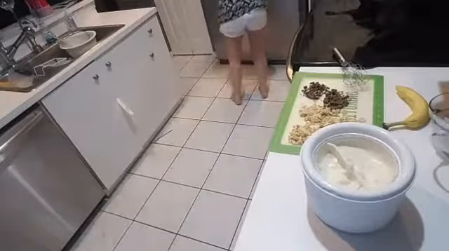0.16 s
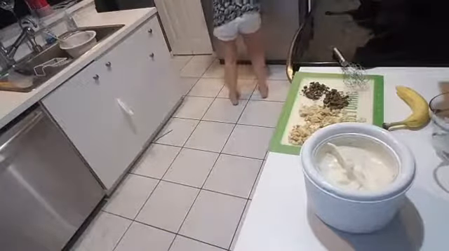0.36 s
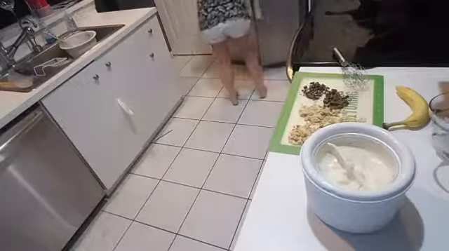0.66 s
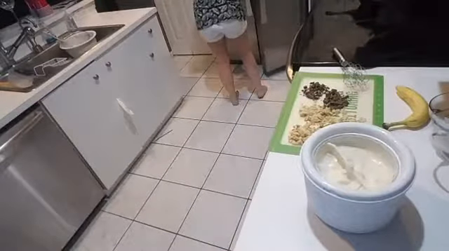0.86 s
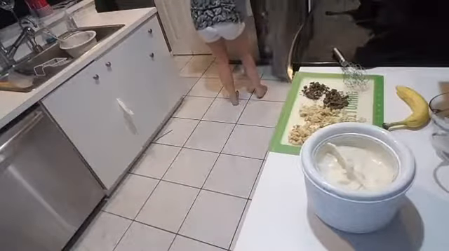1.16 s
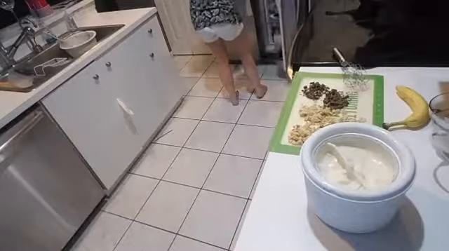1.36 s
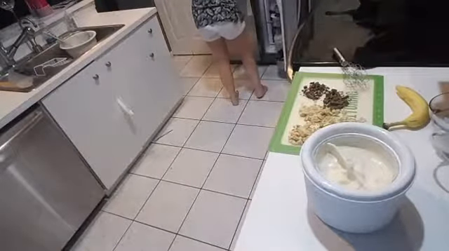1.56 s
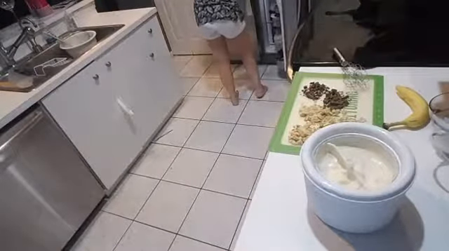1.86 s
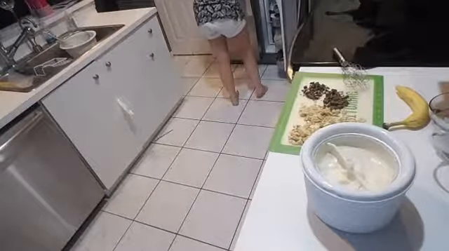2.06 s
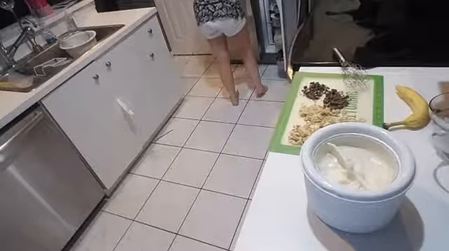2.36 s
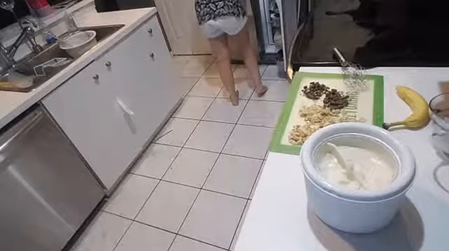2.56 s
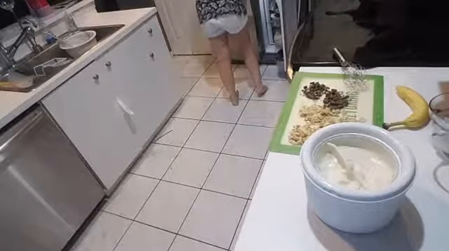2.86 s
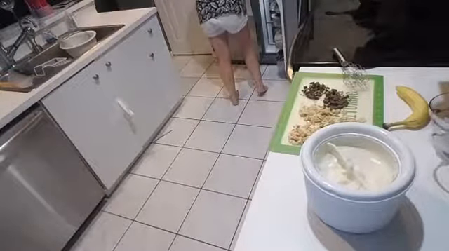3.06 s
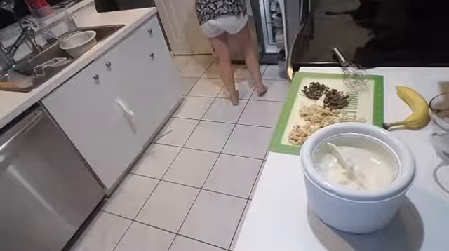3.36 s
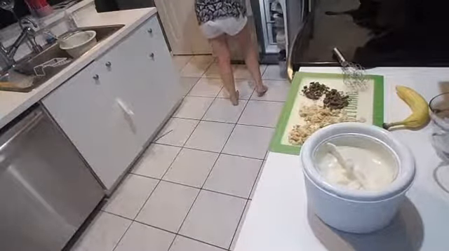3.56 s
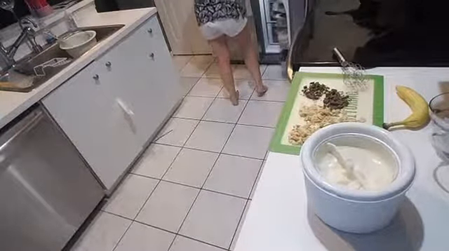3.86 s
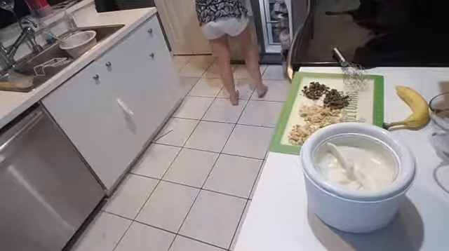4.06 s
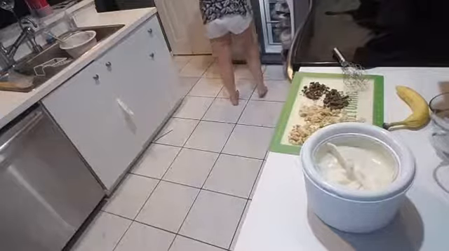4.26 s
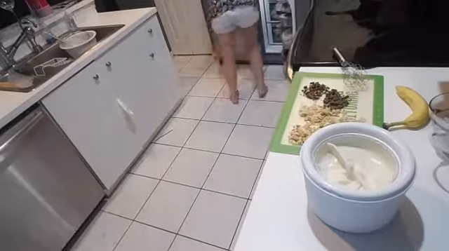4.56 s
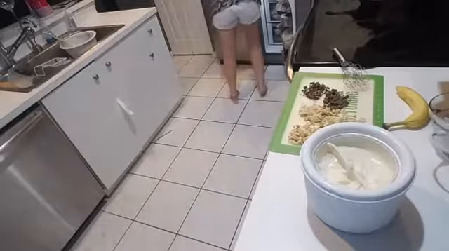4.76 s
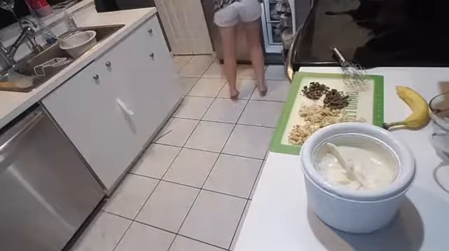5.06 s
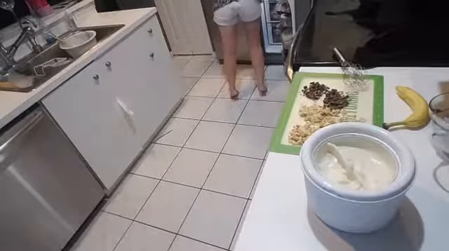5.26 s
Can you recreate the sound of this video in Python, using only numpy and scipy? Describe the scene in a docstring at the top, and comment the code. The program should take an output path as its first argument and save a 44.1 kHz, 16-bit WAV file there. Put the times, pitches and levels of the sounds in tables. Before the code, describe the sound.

A freezer door clunks open with a clink and jar rattle, then a bowl bangs onto a wire shelf over a low fan hum.

```python
"""A freezer door is pulled open across a tiled kitchen: a fan hums throughout, as noise rumble and air.
First come knocks (noise rattles and swinging panels), a clink of the handle and jars chattering in the
door bins (noise through resonances), amid rubbing (grainy noise). Then a bowl is set and slid on a wire
shelf (resonances struck and driven by noise), and knocks and rubbing end the scene. The microphone hears
direct sound and kitchen reverberation about equally, the booms nearly dry, with some recorder hiss."""
import sys
import numpy as np
from scipy import signal
from scipy.fft import rfft, irfft, next_fast_len
from scipy.io import wavfile
from scipy.ndimage import uniform_filter1d, map_coordinates

SR = 44100
rng = np.random.default_rng(int(sys.argv[2]) if len(sys.argv) > 2 else 0)


def log_audio(samples):
    """Write samples as a 16-bit WAV file to the path given in sys.argv[1]."""
    # one column per channel
    frames = np.atleast_2d(samples).T
    # limit to full scale, then quantise
    limited = np.clip(frames, -1, 1)
    pcm = np.round(limited * 32767).astype(np.int16)
    wavfile.write(sys.argv[1], SR, pcm)


N = 238140


def knocks():
    """Each knock is a short rattle of contacts that rings the liner; its slow push booms in the cabinet."""
    # things knocking inside: t/s, clack level/dB, boom level/dB, boom f/Hz,
    # body and treble level/dB (tilts of the clack's colour), contact fade/ms (held to 2-60)
    knock_rows = [(0.1286, -53, -51, 221, 15, -17, 18), (0.16, -50, -55, 101, 12.5, -5.5, 26),
                  (0.401, -14, -47, 62, -13.5, -12, 14), (0.4072, -9, -40, 104, -13.5, -33, 5.1),
                  (0.4357, -28, -48, 216, -28, -11, 16), (0.539, -25, -41, 240, -8, -15, 7.6),
                  (0.579, -20, -30, 151.7, 1, -15, 5), (0.5942, -47, -37, 142, -5, -27, 10),
                  (0.7492, -61, -50, 90, 2, -34, 7.2), (0.9539, -44.5, -49, 182, -19, -18, 24),
                  (1.561, -27.5, -58, 62, -13.5, 2.5, 8.2), (1.567, -13.5, -47, 153, -19.5, -35, 14.5),
                  (1.6113, -40, -49, 180, -1, -36, 18), (1.6344, -44, -52, 150, 6, 0, 7.6),
                  (2.0285, -72, -43, 96, -14, -19, 15), (2.6444, -25, -40.5, 203, -4.5, -16, 18),
                  (2.678, -31.5, -36, 223, -2.5, -15.5, 23.5), (2.815, -17.5, -31, 356, -2.5, -22, 17),
                  (2.827, -22.5, -22.5, 198, -2.5, -14, 23.4), (2.8491, -21, -30.5, 283, -4, -23.5, 10),
                  (3.027, -20.5, -42.5, 338, -7.5, -17, 14.7), (3.0362, -22, -31, 107, -4, -12.5, 19.4),
                  (3.0906, -29, -38.5, 237, -8, -13, 8), (3.6042, -38.5, -34, 218, 2.5, -22.5, 31.6),
                  (3.6246, -44, -32, 159.4, 8, -17, 14), (3.7598, -44.5, -52, 214, -1, -17, 9.6),
                  (4.3993, -32, -44, 152, -14, -23, 8), (4.4103, -23.5, -31.5, 230, -1.5, -26, 6.8),
                  (4.4218, -25.5, -18, 219, 8, -17, 3.1), (4.4496, -40, -23.5, 216.4, -12, -15, 10.5),
                  (4.535, -52, -47.5, 217, -22, -12, 29), (4.785, -38.5, -50, 192, 3.5, 2.5, 5.2),
                  (4.792, -36.5, -39, 235, -40, -11, 20.5), (4.9006, -45.5, -38.5, 194, 2.5, -10, 71),
                  (4.9376, -27, -44.5, 149, -14, -8, 7.4), (4.984, -35.5, -44, 228, -30, -10.5, 37),
                  (5.032, -29.5, -44, 99, -14.5, -4, 10.6), (5.0843, -45, -46, 205, -26, -9, 77),
                  (5.1774, -37, -52, 98, -14, -13, 10), (5.2299, -47, -39, 235, 9.5, -15, 6),
                  (5.2437, -45.5, -40, 223, -8, -14, 21), (5.2707, -40, -44.5, 255, 12, -8, 6.2),
                  (5.2845, -36, -35.5, 165, -5, -19, 12.6), (5.3098, -40, -41, 171, -19, -8, 18)]
    # plastic liner that every knock rings: f/Hz, width/Hz, level/dB (before scatter)
    liner_modes = [(612, 75, -5), (696, 125, -6), (1190, 124, -2), (1470, 130, -1.5), (2044, 70, -4),
                   (2368, 90, -4.5)]
    # cabinet panels: f/Hz, width/Hz, level/dB
    cabinet_modes = [(68.3, 19, -16.5), (101.4, 17, 0.5), (138, 21, -2), (221.8, 45, -1.5), (307, 26, 13),
                     (420, 31, -10)]
    liner_scatter_db = 2.5  # each knock wakes the modes differently
    boom_fade_s = 0.016
    clack_delay_s = 0.000934  # direct clack behind the start of the liner's ring
    length = SR // 2
    t = np.arange(length) / SR
    out = np.zeros(N + length)
    for s, db, boom_db, boom_hz, body_db, treble_db, contact_ms in knock_rows:
        contact_s = np.clip(contact_ms, 2, 60) / 1000
        fade = (1 - np.exp(-t / 0.0016)) * np.exp(-t / contact_s)
        # the roughness takes a new level every 64 samples
        roughness = amp(3.0 * rng.standard_normal(length // 64 + 1)).repeat(64)[:length]
        rattle = rng.standard_normal(length) * roughness * fade
        rattle = amp(db) * rattle * np.linalg.norm(fade) / np.linalg.norm(rattle)

        # clack colour: f/Hz, level/dB
        colour = [(120, body_db - 5), (300, body_db + 5), (600, body_db + 10.5), (1100, body_db + 1),
                  (2500, -2.5), (4500, -9.0), (7000, treble_db / 2 - 3), (10000, treble_db),
                  (13000, treble_db + 4.0)]
        ring = modes([(hz, width, level + liner_scatter_db * rng.standard_normal())
                      for hz, width, level in liner_modes])

        def clack_response(hz):
            """Coloured direct clack plus the ringing liner."""
            return amp(along(colour, hz)) * (np.exp(-2j * np.pi * hz * clack_delay_s) + ring(hz))

        clack = filtered(rattle, clack_response)
        # the nearest panel swings a few cycles and shakes the others
        push = np.exp(-t / boom_fade_s) * np.sin(2 * np.pi * boom_hz * t)
        boom = amp(boom_db) * (push + 0.47 * filtered(push, modes(cabinet_modes)))
        heard = kitchen(clack, direct_db=-2.0) + boom + amp(-5.5) * kitchen(boom, direct_db=-49)
        out[round(s * SR):][:length] += heard
    return out[:N]


def shelf():
    """The wires ring when struck and sing while the bowl slides; hard pressure wakes the upper modes."""
    # blows on the wire shelf: t/s, force level/dB
    blow_rows = [(2.8124, 11.5), (2.8214, 19), (2.828, 10.5), (2.8444, -6), (2.8994, 5), (4.0906, -16),
                 (4.4134, 1), (4.44, -8), (4.5, -11)]
    # two slides of the bowl on the wires: t/s, pressure level/dB
    slide_curves = [
        [(3.25, -64), (3.35, -64), (3.486, -56), (3.58, -61)],
        [(3.7, -53), (3.92, -51.5), (4.06, -50), (4.09, -44), (4.115, -43.5), (4.15, -77)],
    ]
    # ringing wires: f/Hz, width/Hz, level/dB
    wire_modes = [(1250, 100, -7), (2270, 60, -4), (3445, 35, -3), (3520, 35, -2), (3595, 35, -1),
                  (5050, 70, -8), (6750, 60, -14), (6930, 60, -18), (8720, 90, -19), (10800, 70, -19),
                  (12400, 80, -25), (13100, 150, -27)]
    firm_db = -50  # pressure at which the upper modes are driven upper_db over the lower
    upper_db, upper_grows = 6.5, 0.48  # dB; extra dB per dB of pressure
    press_db = level_curve(*slide_curves)

    def force(hz):
        """Driving force on a mode, from the pressure of the bowl."""
        if hz < 6000:
            return amp(press_db)
        return amp(press_db + upper_db + upper_grows * (press_db - firm_db))

    singing = chattered(wire_modes, force, uneven_db=3.0, rate=26)
    return kitchen(singing + struck(blow_rows, wire_modes), direct_db=2.5)


def bins():
    """Jars in the door bins chatter when the door swings or stops; the handle clinks."""
    # jolts of the door bins: peak t/s, force level/dB, rise/ms, fall/ms (20 dB each)
    jolt_rows = [(0.439, -15.5, 8.5, 24), (0.554, -30, 37, 8), (0.965, -33.5, 81, 91), (1.6, -37, 30, 100),
                 (5.335, -30.5, 38, 25)]
    # door bins with their jars: f/Hz, width/Hz, level/dB
    bin_modes = [(1050, 22.5, -15), (1268, 46, -3.5), (2060, 38, 1), (2145, 50, -4.5), (2390, 150, -14),
                 (2970, 100, -16), (3343, 33, -7)]
    # clinks of the door handle: t/s, force level/dB
    clink_rows = [(0.403, 22.5), (0.4344, 18.5)]
    # door handle: f/Hz, width/Hz, level/dB
    handle_modes = [(11790, 20, 0), (12160, 20, 0), (12470, 30, -5), (12830, 40, -6), (13050, 50, -5)]
    jolts = sum(swell(*row) for row in jolt_rows)
    chatter = chattered(bin_modes, lambda hz: jolts, uneven_db=5.5, rate=45)
    return kitchen(chatter + struck(clink_rows, handle_modes), direct_db=-2.5)


def rubbing():
    """Seal, hands and packets rub: dense uneven grains of noise, a dull part and a crisp part."""
    # rubs: peak t/s, level/dB, rise/ms, fall/ms (20 dB each), crisp level/dB over the dull
    rub_rows = [(0.185, -56, 49, 43, -12), (0.58, -42, 102, 134, -27), (0.966, -63.5, 310, 150, -8),
                (1.572, -41.5, 30, 11, 11), (4.946, -56.5, 170, 170, -6), (5.045, -73, 83, 170, 7),
                (5.21, -62, 140, 15, -3), (5.3, -59.5, 15, 220, 5)]
    low = sum(swell(*row[:-1]) for row in rub_rows)
    high = sum(amp(row[-1]) * swell(*row[:-1]) for row in rub_rows)
    # about 90 scattered snaps a second, each spread over 60 samples
    snaps = (rng.random(N) < 90 / SR) * rng.exponential(52, N)
    crackle = uniform_filter1d(snaps, size=60)
    grain = amp(1.5 * wobble(40) + 1.2 * wobble(200)) * (1 + crackle)
    dull = noise([(150, -8.0), (400, 4.5), (1500, -7.5), (4000, -17), (7000, -22.5)])
    crisp = noise([(3000, -16), (6000, 4.0), (9000, -27.5), (14000, 16.5)])
    return kitchen(grain * (low * dull + high * crisp), direct_db=0.5)


def gust():
    """Deep puff of air, as swelling noise, that is over before 0 s; practically silent in the scene."""
    # puff of air at the door: peak t/s, level/dB, rise/ms, fall/ms (20 dB each)
    puff = (-0.54, -39.5, 63, 144)
    return swell(*puff) * noise([(15, -25), (30, -12.0), (68, -1), (100, 10.0), (160, -35), (400, -120)])


def fan():
    """Rumble and air of the cooling fan: two coloured noises, slightly unsteady."""
    # rumble of the fan before its wobble: t/s, level/dB
    hum_curve = [(0, -59.5), (.8, -54), (1.3, -56.5), (2.6, -52.5), (3.4, -54.5), (3.9, -50.5),
                 (4.3, -54.5), (5.4, -52.5)]
    # rumble spectrum: f/Hz, relative level/dB per Hz
    rumble_spectrum = [(12, -55), (20, -29.5), (27, -42), (43, 0.5), (97, -2), (177, -8), (208, -1),
                       (248, -4), (276, -14), (348, -9.5), (382, -13.5), (414, -17.5), (500, -34),
                       (650, -71), (1100, -120)]
    # air spectrum: f/Hz, relative level/dB per Hz
    air_spectrum = [(240, -44), (400, -7.5), (894, -14.5), (1190, -18), (1290, -19), (2120, -22.5),
                    (6000, -40.5), (7800, -71), (13200, -120)]
    air_db = -64.5  # about which the air wobbles
    rumble = amp(level_curve(hum_curve) + 2.1 * wobble(6)) * noise(rumble_spectrum)
    air = amp(air_db + 1.57 * wobble(4.234)) * noise(air_spectrum)
    return rumble + air


def kitchen(x, direct_db):
    """Direct sound over a tail that builds up, dies at its own speed per band and lingers from the next room."""
    # decay of the tiled kitchen: f/Hz, t60/s
    decay = [(100, 0.57), (300, 0.26), (1000, 0.34), (3000, 0.32), (7000, .33), (13000, 0.18)]
    hz, t, z = signal.stft(rng.standard_normal(SR // 2), SR, nperseg=256)
    fall_db = -60 * t / along(decay, hz)[:, None]
    next_room_db = 0.34 * fall_db - 19.5  # fainter and slower to die
    tail = signal.istft(z * (amp(fall_db) + amp(next_room_db)), SR, nperseg=256)[1]
    tail = tail * (1 - np.exp(-np.arange(len(tail)) / SR / 0.00061))
    tail = tail / np.linalg.norm(tail)
    tail[0] = amp(direct_db)  # against a tail of energy 1
    return signal.fftconvolve(x, tail)[:len(x)]


def struck(events, table):
    """A sharp blow at each (t/s, level/dB) rings a set of resonances."""
    blows = np.zeros(N)
    for s, db in events:
        blows[round(s * SR)] += amp(db)
    return filtered(blows, modes(table))


def chattered(table, force, uneven_db, rate):
    """Noisy slips drive each resonance, which swells and fades on its own as the contact point wanders."""
    out = np.zeros(N)
    for mode in table:
        slips = force(mode[0]) * amp(uneven_db * wobble(rate)) * rng.standard_normal(N)
        out += filtered(slips, modes([mode]))
    return out


def modes(table):
    """Causal response of a set of resonances (f/Hz, width/Hz, level/dB), alternating in sign."""
    def response(f):
        """Sum of the resonances at frequency f."""
        total = 0
        for k, (centre, width, db) in enumerate(table):
            damping = 1j * f * width
            total = total + (-1) ** k * amp(db) * damping / (centre * centre - f * f + damping)
        return total
    return response


def swell(s, db, rise_ms, fall_ms):
    """Gain that climbs 20 dB in the rise time to its peak and loses 20 dB in the fall time."""
    ms = 1000 * (np.arange(N) / SR - s)
    return amp(db - 20 * np.where(ms < 0, -ms / rise_ms, ms / fall_ms))


def level_curve(*tables):
    """Level in dB for every sample from (t/s, level/dB) points; -120 dB outside the tables."""
    t = np.arange(N) / SR
    out = np.full(N, -120.)
    for rows in tables:
        s, db = np.transpose(rows)
        inside = (t >= s[0]) & (t <= s[-1])
        out[inside] = np.interp(t[inside], s, db)
    return out


def wobble(rate):
    """A smooth random curve, rate knots a second."""
    knots = rng.standard_normal(int(N * rate / SR) + 4)
    return map_coordinates(knots, [np.arange(N) * rate / SR])


def noise(spectrum):
    """Coloured noise of rms 1."""
    return unit(filtered(rng.standard_normal(N), lambda hz: amp(along(spectrum, hz))))


def filtered(x, response):
    """x through a complex response of frequency."""
    n = x.shape[-1]
    m = next_fast_len(n + SR // 4)
    return irfft(rfft(x, m) * response(np.fft.rfftfreq(m, 1 / SR)), m)[..., :n]


def along(points, hz):
    """Interpolates (f/Hz, value) points on a log frequency axis."""
    f, v = np.transpose(points)
    return np.interp(np.log(hz + 1), np.log(f + 1), v)


def amp(db):
    """dB to gain."""
    return 10 ** (np.asarray(db) / 20)


def unit(x):
    """Scaled to rms 1."""
    return x / np.sqrt(np.mean(x ** 2) + 1e-20)


def scene():
    """All sources in one channel."""
    return (knocks() + shelf() + bins() + rubbing() + gust() + fan())[None]


def record(dry):
    """Microphone colour, recorder hiss and band limit."""
    # microphone response: f/Hz, level/dB
    mic_colour = [(30, -14), (100, 3), (4000, -1.5), (6000, -5), (7700, -6), (9000, 0), (12500, -1),
                  (14000, -5)]
    # recorder hiss spectrum: f/Hz, relative level/dB per Hz
    hiss_spectrum = [(1760, -21), (3000, 3), (5050, 4), (6200, 0.5), (8560, 0), (13400, 3.5), (14200, -2),
                     (14500, -16)]
    hiss_db, top_hz = -75.5, 14150  # hiss before the band limit; middle of a 300 Hz wide slope
    heard = filtered(dry, lambda hz: amp(along(mic_colour, hz)))
    heard = heard + amp(hiss_db) * noise(hiss_spectrum)
    return filtered(heard, lambda hz: np.clip((top_hz - hz) / 300 + .5, 0, 1) ** 2)


dry = scene()
out = record(dry)
log_audio(out)
```